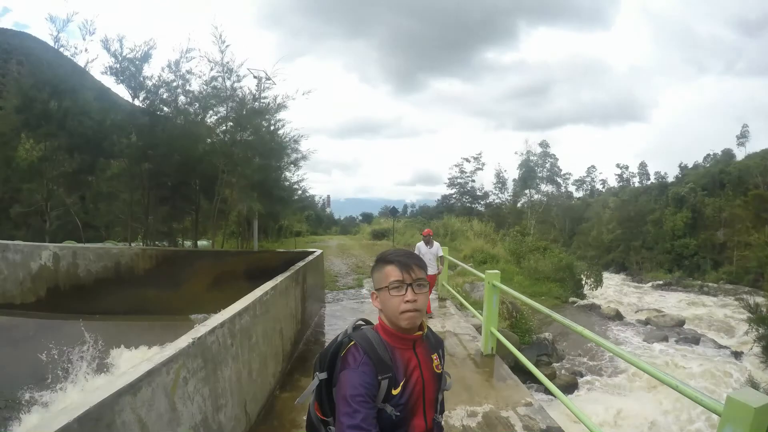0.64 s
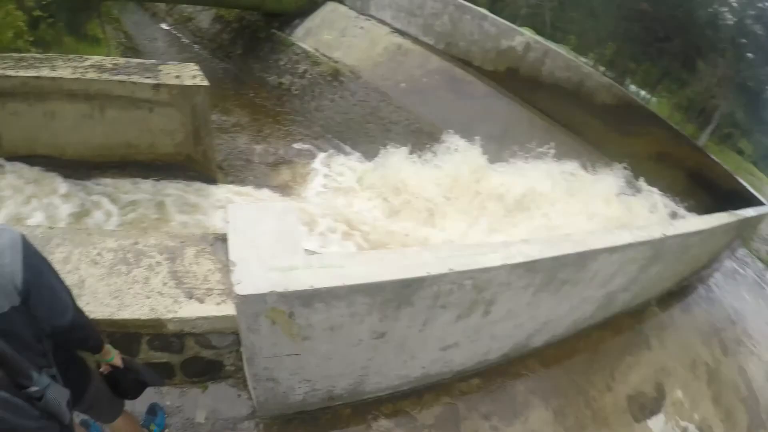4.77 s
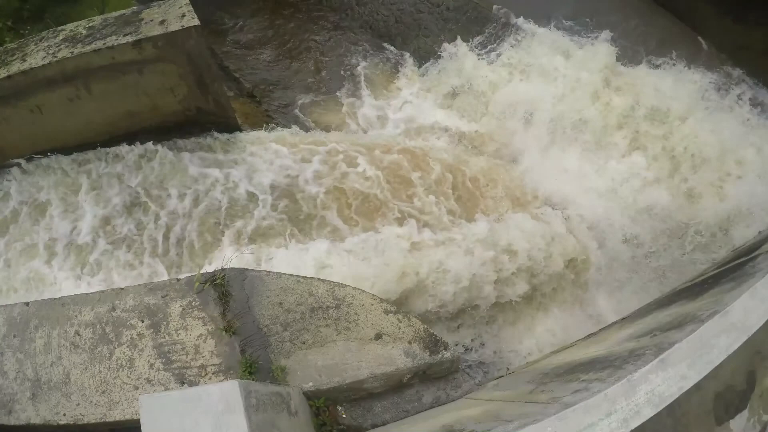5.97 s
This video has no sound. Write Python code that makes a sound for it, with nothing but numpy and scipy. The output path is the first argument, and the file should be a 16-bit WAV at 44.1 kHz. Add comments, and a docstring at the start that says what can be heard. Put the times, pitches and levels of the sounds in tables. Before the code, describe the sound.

Whitewater rushes steadily through a concrete spillway, sounding slightly boxy through a small camera's waterproof case. Close by, a hand ticks, rubs and thumps on the camera pole over a low handling rumble. The mount creaks, squeaks once and snaps into place about halfway. More dull thumps follow as the camera swings toward the foam and the rush grows louder and brighter, with a hard bump near the end.

```python
"""At a concrete spillway: rushing whitewater, heard by a small camera in a waterproof case on a pole.
The hand-held pole sways and is swung round to face the foam, so the rush grows louder and brighter.
The hand ticks, thumps and rubs on the pole, ringing pole and case; twice the pole bumps something hard.
The mount creaks as it slips, squeaks once and snaps into place."""
import sys
import numpy as np
from scipy import signal
from scipy.fft import rfft, irfft, next_fast_len
from scipy.io import wavfile
from scipy.ndimage import map_coordinates

SR = 44100
rng = np.random.default_rng(int(sys.argv[2]) if len(sys.argv) > 2 else 0)


def wrap_up_sound(samples):
    """Save the sound to the file named by the first command line argument, as 16-bit audio."""
    columns = np.atleast_2d(samples).T
    # keep every value between -1 and 1, then stretch to whole-number steps
    tamed = np.clip(columns, -1, 1)
    steps = np.round(tamed * 32767).astype(np.int16)
    wavfile.write(sys.argv[1], SR, steps)


N = 308259
TIME = np.arange(N) / SR

# Rush density before the case walls: f/Hz, turned away/dB, facing the foam/dB
RUSH_SPECTRUM = [(181, -77.5, -70), (388, -81, -74), (1100, -82.5, -77), (1860, -82, -71), (2600, -81, -73),
                 (4130, -89.5, -75.5), (6000, -92, -83.5), (7840, -100.5, -86.5), (8600, -98, -90.5),
                 (13900, -105.7, -93)]
# Camera heading: t/s, facing the foam/0-1
HEADING = [(0, 0.15), (1.0, 0.04), (2.0, 0.05), (3.0, 0.09), (4.0, 0), (4.5, 0.15), (4.9, 0.31),
           (5.3, 0.55), (5.8, 0.99), (6.3, 0.99), (7.0, 1.0)]
# Case wall peaks and dips: f/Hz, width/Hz, gain/dB
WALL_RESONANCES = [(292, 30, 3.5), (846, 87, 2), (1204, 110, -4.5), (1310, 160, 4.5), (1677, 140, 4),
                   (2050, 76, 8.5), (2400, 210, 2.5), (3080, 43, -9.5), (3473, 320, 8.5), (4880, 260, 4),
                   (5380, 510, 5.5), (5950, 250, -5.5), (7130, 650, 3), (7860, 660, 4.5), (8770, 400, -6),
                   (13100, 570, 4), (13550, 550, -4)]
# Pole sway: t/s, relative level/dB
SWAY_LEVELS = [(0.0, -34.5), (0.31, -44), (1.17, -38.5), (1.52, -44.5), (1.79, -37), (1.93, -38),
               (2.12, -35.5), (2.72, -24), (2.92, -24), (3.33, -20.5), (3.46, -24), (4.26, -34.5),
               (4.44, -34.5), (4.65, -31), (5.14, -33), (5.39, -36.5), (6.43, -39.5), (6.99, -43.5)]
# Grip rumble: f/Hz, relative density/dB
GRIP_SPECTRUM = [(10, -36), (20, -15), (45, 1.5), (85, 3), (115, -6), (160, -9), (220, -30.5), (400, -23),
                 (900, -66)]
# Grip slips: t/s, relative level/dB, high edge f/Hz
GRIP_TICKS = [(1.461, -34, 2800), (1.551, -37, 2000), (1.652, -35.5, 850), (1.905, -34, 1800),
              (1.932, -34.5, 2000), (2.988, -18.5, 1770), (3.004, -21.5, 2400), (3.041, -23, 2700),
              (3.339, -14.5, 990), (3.43, -16, 3660), (4.595, -24, 3220), (4.74, -25, 2280),
              (4.755, -21, 2490), (5.103, -25, 1900), (5.119, -28, 2900), (5.42, -27, 1850),
              (5.453, -22, 2010), (5.474, -29.5, 1700), (5.542, -24, 2100), (5.557, -24, 2170),
              (5.637, -28, 2600), (5.669, -22.5, 2000), (5.683, -16.5, 2490), (5.809, -22, 2400),
              (5.953, -26.5, 1800), (5.974, -21, 2500), (6.045, -24.5, 734), (6.154, -23, 2000),
              (6.282, -29.5, 1100), (6.398, -18.5, 2820)]
# Case under the hand: f/Hz, relative level/dB, t60/s
CASE_MODES = [(301, -14, 0.35), (465, -0.5, 0.027), (514, -14.5, 0.083), (623, -3, 0.026),
              (775, -7.5, 0.049), (890, -4, 0.019), (1402, -3.5, 0.02), (1550, 1, 0.0019),
              (1777, -13, 0.041), (2186, 12, 0.0039), (2464, -5, 0.014)]
# Upper pole modes: f/Hz, level/dB, t60/s
UPPER_POLE_MODES = [(154, -60, 0.23), (164.1, -11.5, 0.18), (325.6, -15, 0.12)]
# Slip steps of the joint: t/s, level/dB
CREAK_STEPS = [(2.357, -28.5), (2.376, -37), (2.393, -33), (2.424, -31.5), (2.447, -36), (2.467, -35),
               (2.483, -37), (2.499, -35)]
# Hollow modes rung by the joint: f/Hz, level/dB, t60/s
JOINT_MODES = [(302, -11.5, 0.33), (483, -5, 0.027), (612, 2, 0.042), (670, -29, 0.022), (865, -10, 0.043),
               (1340, 4, 0.017)]
# Hand thumps: t/s, push/dB, f/Hz, rise/s, tail/dB, knock on upper modes/dB
HAND_THUMPS = [(2.722, -26, 70, .017, -21, -31), (2.783, -15, 70.7, .017, -24, -20),
               (2.983, -2.5, 88, 0.015, -8.5, 0), (3.031, -23, 89, 0.011, -25, -3.5),
               (3.208, -13, 92, 0.013, -6.5, -8), (3.361, -26, 90, 0.024, -4.5, -8.5),
               (3.408, -11, 83.4, 0.016, -18, -12), (4.475, -21.5, 85.5, .016, -41, -28),
               (4.512, -16.5, 93, 0.0058, -27, -12), (4.573, 0, 75.4, 0.019, -7, -3.5),
               (4.634, -22, 98.4, .012, -18, -19), (4.815, -12.5, 66, 0.015, -35, -23),
               (4.942, -16, 30.8, .037, -36, -23), (5.032, -19, 85.8, 0.011, -26, -16.5),
               (5.562, -23, 141, 0.02, -40, -29), (5.639, -17, 71, 0.012, -32, -30),
               (5.864, -2.5, 68, .014, -12, -13.5), (6.048, -23, 81, 0.0038, -18, -31),
               (6.278, -18.5, 65.5, 0.025, -37, -18), (6.399, 3, 72.8, 0.0066, -3, -24)]
# Hand slides: t/s, length/s, relative end level/dB, treble/dB
HAND_SLIDES = [(2.768, 0.079, -34.5, -2), (2.969, 0.1, -25, -5), (3.094, 0.034, -17.5, -3.5),
               (3.343, 0.0097, -18.5, -2), (3.424, .025, -44, 3), (4.517, 0.092, -38, 3),
               (4.744, 0.04, -28.5, -0.5), (4.894, 0.085, -32, 0), (5.014, .105, -32.5, 2),
               (5.15, 0.13, -37.5, .5)]
# Hard contacts: t/s, level/dB
HARD_BUMPS = [(3.106, -13.5), (6.4, -1)]
# Hollow case body: f/Hz, level/dB, t60/s
BODY_MODES = [(127, 0, 0.072), (309, -23, 0.19), (372, -12.5, 0.038), (426, -6, 0.035), (504, -7.5, 0.057)]
# Slipping mount: t/s, f/Hz, level/dB
SQUEAK_GLIDE = [(3.322, 600, -45), (3.345, 960, -14.5), (3.353, 1380, -26), (3.363, 1853, -7.5),
                (3.372, 2050, -18), (3.39, 2050, -74)]
# Catching mount: t/s, ring/dB, crack/dB
MOUNT_SNAPS = [(3.361, -9.5, -46), (3.4296, -34, -22)]
# Mount modes: f/Hz, level/dB, t60/s
MOUNT_MODES = [(303, -3.5, 0.11), (940, -5.5, 0.053), (1860, -12, 0.22), (2100, -21, 0.071),
               (2400, -21, 0.062), (2800, -34, 0.26)]


def from_db(db):
    """dB to gain."""
    return 10 ** (np.asarray(db) / 20)


def unit_rms(x):
    """Scale to unit power."""
    return x / np.sqrt(np.mean(x ** 2) + 1e-20)


def in_time(rows):
    """Curve columns at every sample."""
    t_s, *columns = np.transpose(rows)
    return [np.interp(TIME, t_s, c) for c in columns]


def at_hz(rows, hz):
    """Spectrum columns, interpolated in log frequency."""
    knots_hz, *columns = np.transpose(rows)
    return [np.interp(np.log(hz + 1), np.log(knots_hz), c) for c in columns]


def cut(x, hz, kind, order=2):
    """Butterworth filter."""
    return signal.sosfilt(signal.butter(order, hz, kind, fs=SR, output="sos"), x + 1e-18)


def colour(x, db_at):
    """Apply a frequency-dependent gain in dB."""
    size = next_fast_len(N)
    return irfft(rfft(x, size) * from_db(db_at(np.fft.rfftfreq(size, 1 / SR))), size)[:N]


def drift(rate_hz):
    """Smooth random curve, unit RMS."""
    return unit_rms(map_coordinates(rng.standard_normal(4096), [TIME * rate_hz], order=2, mode="wrap"))


def clicks(rows):
    """Impulses from rows of t/s, level/dB."""
    out = np.zeros(N)
    for t_s, level_db in rows:
        out[round(t_s * SR)] += from_db(level_db)
    return out


def ring(force, modes):
    """Damped resonators driven by one force."""
    out = np.zeros(N)
    for hz, level_db, t60_s in modes:
        radius = from_db(-60 / (t60_s * SR))
        real = radius * np.cos(2 * np.pi * hz / SR)
        out += from_db(level_db) * signal.lfilter([1, -real], [1, -2 * real, radius ** 2], force + 1e-18)
    return out


def ring_case(force):
    """Case response to the hand; the soft grip takes off the treble."""
    body_gain = np.sqrt(np.sum(ring(TIME == 0, CASE_MODES) ** 2))
    body = ring(force, CASE_MODES) / body_gain
    return cut(cut(body, 2570, "low", order=8), 204, "high")


def shake_pole(pushes, t60_s=0.31):
    """Pole response to soft pushes: a cycle or two, a tail, a knock on the upper modes."""
    out = np.zeros(N)
    for t_s, push_db, hz, rise_s, tail_db, _ in pushes:
        start = round(t_s * SR)
        t = TIME[:min(SR // 2, N - start)]
        onset = (t / rise_s) ** 2
        push = from_db(push_db) * onset * np.exp(1 - onset)
        tail = from_db(tail_db - 60 * t / t60_s) * (1 - np.exp(-onset))
        out[start:start + len(t)] += np.hypot(push, tail) * np.sin(2 * np.pi * hz * t)
    knocks = clicks([(t_s, knock_db) for t_s, *_, knock_db in pushes])
    return out + ring(cut(knocks, 236, "low", order=4), UPPER_POLE_MODES)


def slide(start_s, length_s, end_db, attack_s=0.022, swell_db=5.5, release_s=0.021):
    """Slide envelope: the hand takes hold, presses harder, lets go."""
    early_s = np.maximum(start_s - TIME, 0)
    late_s = np.maximum(TIME - start_s - length_s, 0)
    to_go = np.clip((start_s + length_s - TIME) / length_s, 0, 1)
    fade = np.exp(-np.minimum(early_s / attack_s + late_s / release_s, 20))
    return from_db(end_db - swell_db * to_go) * fade


def spray(splashes_per_s=900, spread_db=3.5, splash_gain=0.31, churn_db=1.0):
    """White rush of countless bubbles plus nearer splashes; each band churns on its own."""
    sizes = from_db(spread_db * np.minimum(rng.exponential(1, N), 4)) * rng.choice([-1, 1], N)
    splashes = unit_rms(sizes * (rng.random(N) < splashes_per_s / SR))
    rest = rng.standard_normal(N) + splash_gain * splashes
    out = np.zeros(N)
    for edge_hz in (500, 1000, 2000, 4000, 8000):
        band = signal.sosfiltfilt(signal.butter(2, edge_hz, fs=SR, output="sos"), rest)
        out += band * from_db(churn_db * drift(35))
        rest -= band
    return unit_rms(out + rest * from_db(churn_db * drift(35)))


def whitewater():
    """Rush through the case walls, louder and brighter when facing the foam."""
    def walls_db(hz):
        return sum(db / (1 + (2 * (hz - centre_hz) / width_hz) ** 2)
                   for centre_hz, width_hz, db in WALL_RESONANCES)

    rush = colour(spray() * np.sqrt(SR / 2), walls_db)  # input: unit power per Hz
    away = colour(rush, lambda hz: at_hz(RUSH_SPECTRUM, hz)[0])
    towards = colour(rush, lambda hz: at_hz(RUSH_SPECTRUM, hz)[1])
    facing, = in_time(HEADING)
    return cut(away + facing * (towards - away), 77, "high")


def pole_sway(mode_hz=30.25, wander=0.139, gain_db=2.5, flutter_db=4.5):
    """The pole bends at its lowest mode, unsteady in pitch and level."""
    sway_db, = in_time(SWAY_LEVELS)
    hz = mode_hz * (1 + wander * drift(22))
    bending = np.sqrt(2) * np.sin(2 * np.pi * np.cumsum(hz) / SR)
    return from_db(sway_db + gain_db + flutter_db * drift(20)) * bending


def grip_rumble(hold_db=-41, sway_db_per_db=0.38, slide_db=-9, slide_db_per_db=0.64, flutter_db=3.0):
    """The grip rumbles through the pole, more with sway and with slides."""
    sway_db, = in_time(SWAY_LEVELS)
    holding = from_db(hold_db + sway_db_per_db * (sway_db - sway_db.mean()))
    pressure = sum(slide(t_s, length_s, end_db) for t_s, length_s, end_db, _ in HAND_SLIDES)
    sliding = from_db(slide_db) * pressure ** slide_db_per_db
    envelope = np.hypot(holding, sliding) * from_db(flutter_db * drift(18))
    rumble = unit_rms(colour(rng.standard_normal(N), lambda hz: at_hz(GRIP_SPECTRUM, hz)[0]))
    return envelope * cut(rumble, 870, "low")


def ticks(gain_db=6.0, decay_s=0.0047, low_hz=330, nudge_hz=87.3, rise_s=0.011, tail_db=-17, knock_db=3):
    """Brief grip slips ring the case; each also nudges the pole."""
    force = np.zeros(N)
    t = TIME[:SR // 10]
    for t_s, level_db, high_hz in GRIP_TICKS:
        start = round(t_s * SR)
        slip = rng.choice([-1, 1], len(t)) * np.exp(-t / decay_s)
        slip = cut(cut(slip, high_hz, "low", order=3), low_hz, "high")
        force[start:start + len(t)] += from_db(level_db + gain_db) * slip
    nudges = [(t_s, db, nudge_hz, rise_s, db + tail_db, db + knock_db) for t_s, db, _ in GRIP_TICKS]
    return ring_case(force) + shake_pole(nudges)


def creak():
    """Stick-slip in the joint: each step rings the same hollow modes."""
    return cut(ring(clicks(CREAK_STEPS), JOINT_MODES), 1000, "low", order=4)


def thumps():
    """Soft blows of the hand shake the pole."""
    return shake_pole(HAND_THUMPS)


def rubs(gain_db=0.5, rough_db=3.5, pole_db=-20):
    """Friction of the sliding hand drives case and pole."""
    friction = unit_rms(rng.standard_normal(N) * from_db(rough_db * drift(500)))
    dull = cut(friction, 760, "low", order=1)
    treble = friction - dull
    force = sum(slide(t_s, length_s, end_db + gain_db) * (dull + from_db(treble_db) * treble)
                for t_s, length_s, end_db, treble_db in HAND_SLIDES)
    pole = ring(cut(force, 152, "low", order=4), UPPER_POLE_MODES)
    return ring_case(force) + from_db(pole_db) * pole


def bumps():
    """Hard contacts on the pole ring the hollow case body."""
    return cut(ring(clicks(HARD_BUMPS), BODY_MODES), 462, "low", order=6)


def squeak(half_width_hz=220):
    """The mount binds: a narrow noise band glides up."""
    hz, level_db = in_time(SQUEAK_GLIDE)
    unsteady = cut(rng.standard_normal(N) + 1j * rng.standard_normal(N), half_width_hz, "low")
    band = unit_rms(np.real(unsteady * np.exp(2j * np.pi * np.cumsum(hz) / SR)))
    slipping = (TIME > SQUEAK_GLIDE[0][0]) & (TIME < SQUEAK_GLIDE[-1][0])
    return from_db(level_db) * band * slipping


def snaps(decay_s=0.0037):
    """The mount catches with a ring and a sharp crack."""
    catches = clicks([(t_s, ring_db) for t_s, ring_db, _ in MOUNT_SNAPS])
    envelope = sum(from_db(crack_db) * (TIME >= t_s) * np.exp(-np.clip((TIME - t_s) / decay_s, 0, 20))
                   for t_s, _, crack_db in MOUNT_SNAPS)
    cracks = cut(envelope * rng.standard_normal(N), 6300, "low", order=4)
    return cut(ring(catches, MOUNT_MODES), 2070, "low", order=4) + cracks


def scene():
    """Water outside the case; hand, pole and mount against it. Mono."""
    bed = whitewater() + pole_sway() + grip_rumble()
    handling = ticks() + creak() + thumps() + rubs() + bumps() + squeak() + snaps()
    return (bed + handling)[None]


def record(dry, ceiling=0.97, cutoff_hz=15200):
    """Soft clip on the loudest thumps, then a steep low-pass."""
    rounded = dry / (1 + (dry / ceiling) ** 8) ** (1 / 8)
    return signal.sosfilt(signal.ellip(14, .1, 80, cutoff_hz, fs=SR, output="sos"), rounded)


dry = scene()
out = record(dry)
wrap_up_sound(out)
```